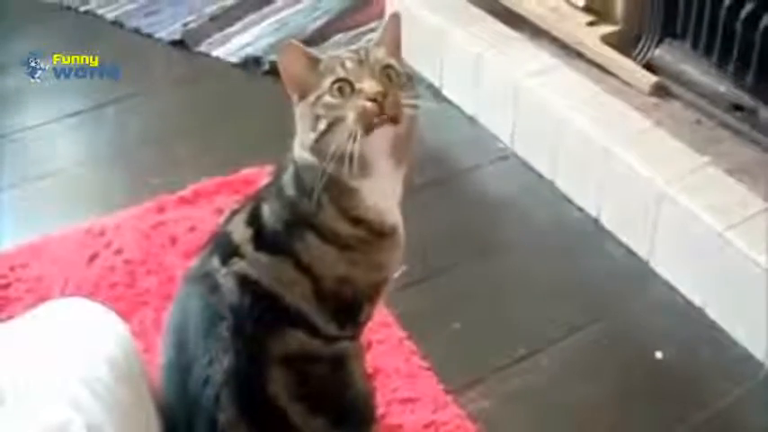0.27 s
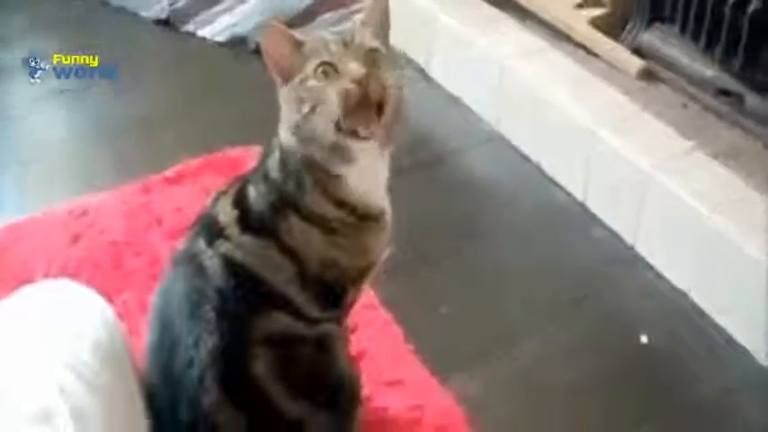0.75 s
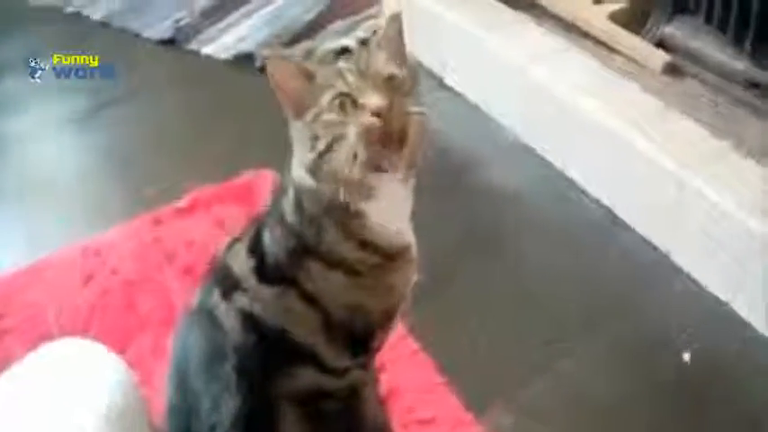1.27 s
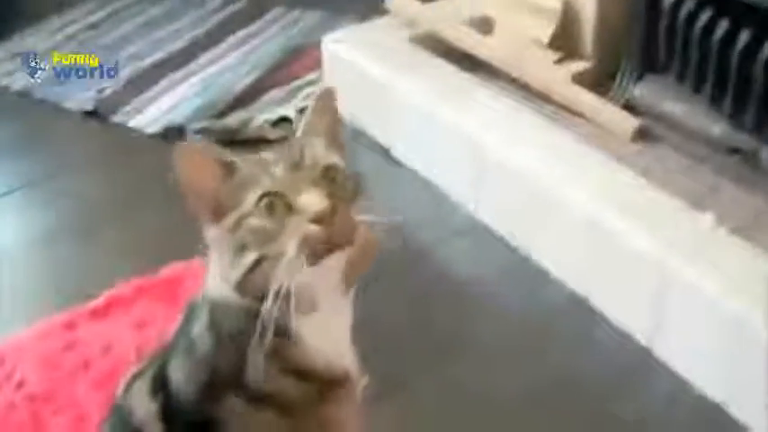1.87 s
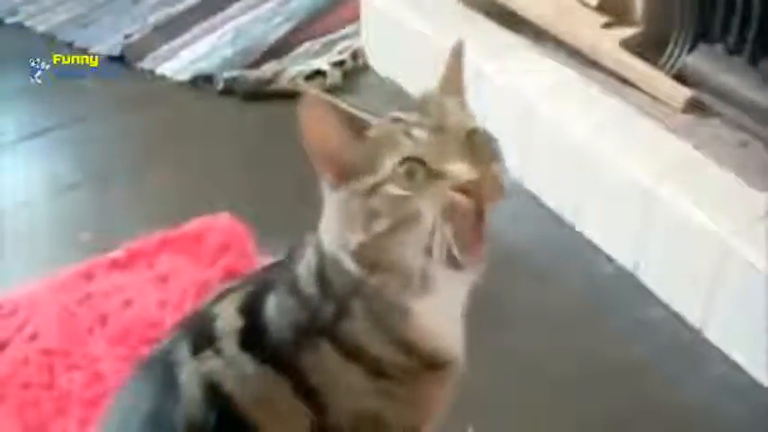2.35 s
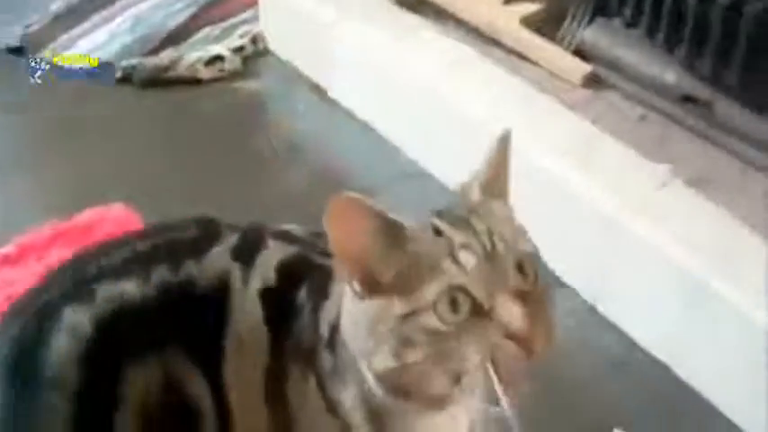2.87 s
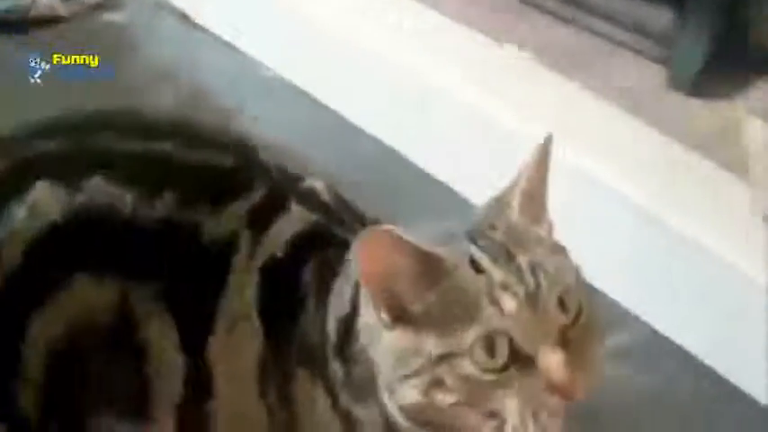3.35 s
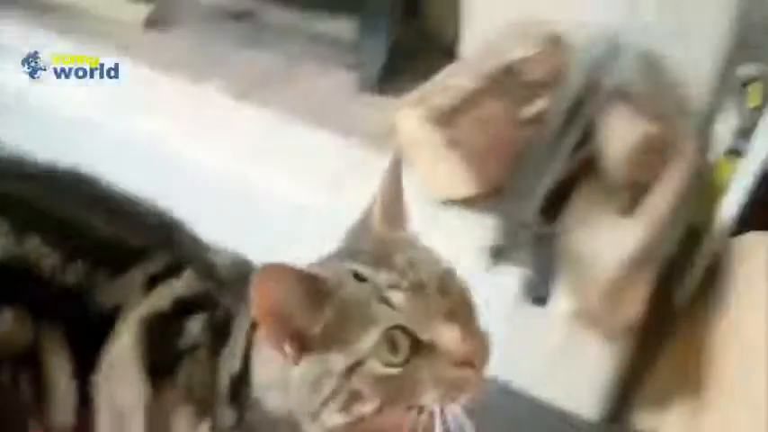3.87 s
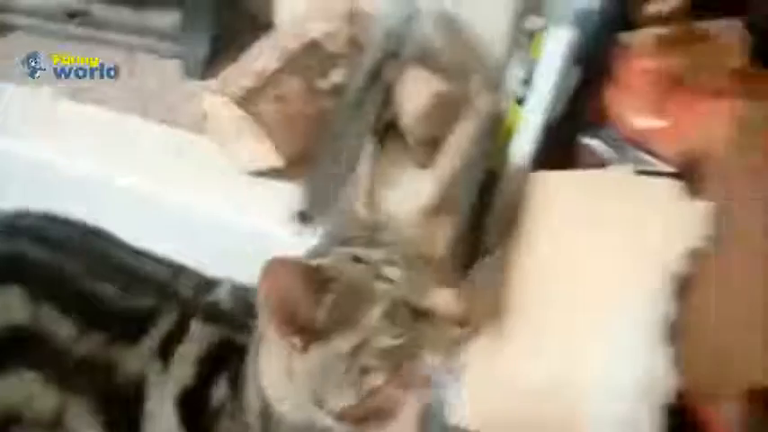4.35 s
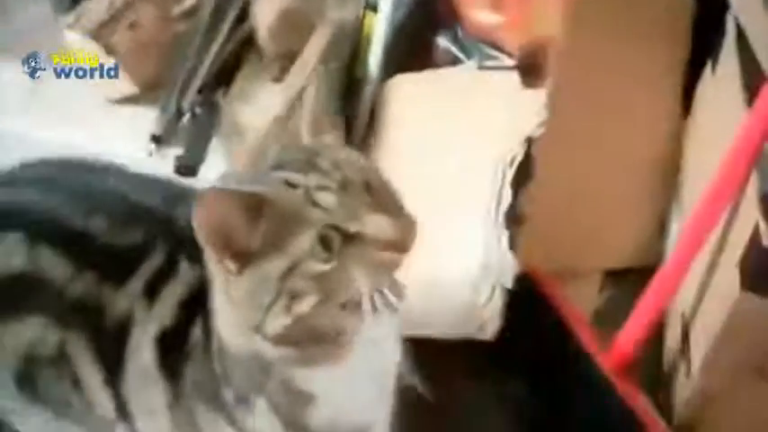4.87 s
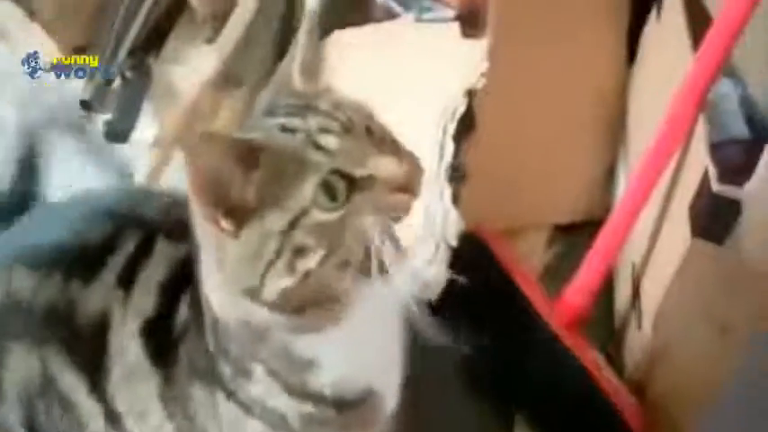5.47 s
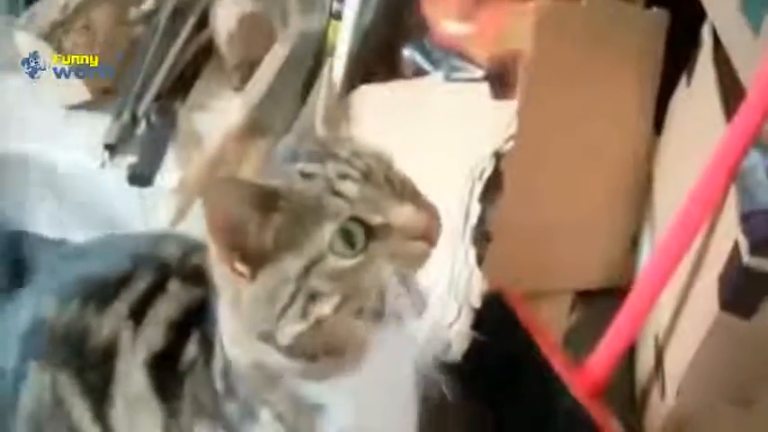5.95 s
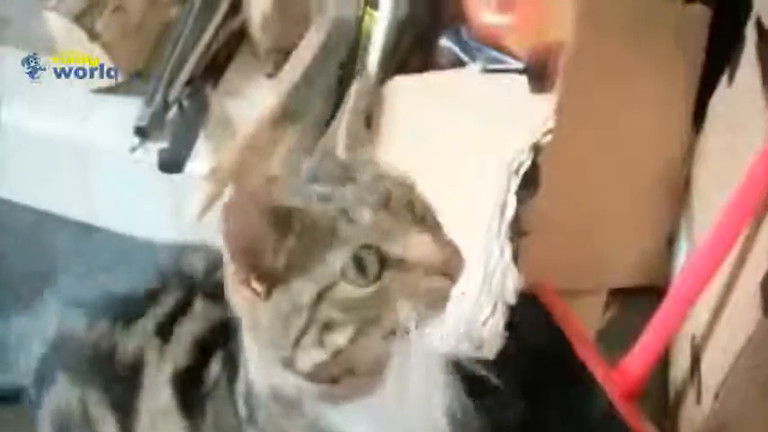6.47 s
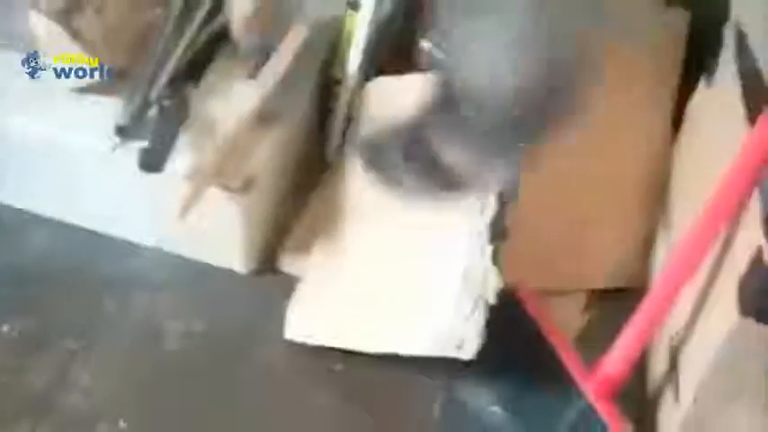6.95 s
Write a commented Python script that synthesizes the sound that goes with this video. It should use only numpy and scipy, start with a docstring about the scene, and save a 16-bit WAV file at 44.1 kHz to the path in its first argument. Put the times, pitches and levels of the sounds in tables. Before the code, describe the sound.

A cat chatters close by in short, creaky, clicking chirps over a steady hiss, with a few light taps and bumps.

```python
"""A cat chatters at prey in a small, stone-floored room, close to a hissy, narrow-band microphone.
It chirps from the start: uneven snaps of the larynx ring the mouth near 2 kHz in a swelling run of
creaks, then air rasps past the teeth. Four light taps come just after two seconds. From three seconds
on, wet ticks join in and a voiced peep leads the odd chirp. Two soft knocks fall around four seconds,
a dry click near five, and at the end something bumps close to the microphone."""
import sys
import numpy as np
from scipy import signal
from scipy.fft import rfft, irfft, next_fast_len
from scipy.io import wavfile
from scipy.ndimage import uniform_filter1d

SR = 44100
rng = np.random.default_rng(int(sys.argv[2]) if len(sys.argv) > 2 else 0)


def transcribe(u):
    """Save the signal u as a 16-bit wav file named by the first command-line argument.

    u: samples, shape (n,) or (channels, n), limited to [-1, 1]; the rate is SR.
    q: integer samples, one column per channel.
    """
    v = np.clip(np.atleast_2d(u).T, -1, 1)
    q = np.round(v * 32767).astype(np.int16)
    wavfile.write(sys.argv[1], SR, q)


N = 317947

# The cat's chirps, close up. Each row: start, opening length and main creak length in seconds, mouth
# resonance in Hz, then in relative dB the mouth, its swell from the opening, the upper resonances,
# the throat and the rasp.
CHIRPS = [(0.173, .017, 0.0075, 2070, -18, 7.5, -18, -31, -31.5),
          (0.298, .013, .023, 2000, -29, 2, -25, -24, -35),
          (0.749, .010, .026, 2010, -23.5, 5, -25.5, -29, -32.5),
          (0.868, 0.018, .012, 1940, -23, 10, -25, -30.5, -30.5),
          (0.972, 0.0054, 0.021, 2040, -24, 3, -25.5, -30.5, -33),
          (1.396, .004, 0.0036, 2040, -25, 18, -26, -45, -31.5),
          (1.525, .020, 0.0036, 1930, -20, 14, -32, -31, -38),
          (2.411, 0.017, .016, 2110, -16.5, 6, -19.5, -28.5, -31.5),
          (2.527, 0.0089, .016, 1940, -21, 6, -30.5, -24, -32.5),
          (2.622, .008, .011, 2000, -21, 11, -31, -32, -37),
          (3.066, 0.013, .021, 1975, -18.5, 8.5, -23, -24.5, -31.5),
          (3.222, .018, .016, 2180, -16.5, 0.5, -18, -24, -32),
          (3.336, .019, .005, 2050, -13.5, 11, -19.5, -30, -38),
          (3.811, .014, 0.014, 2116, -17, 4, -19.5, -29, -33),
          (3.982, .010, 0.0065, 1915, -17.5, 18, -23.5, -25, -37),
          (4.629, .006, .0051, 2010, -20, 10, -25.5, -36, -31.5),
          (4.804, .007, 0.012, 1980, -27.5, 1.5, -26.5, -32, -33.5),
          (5.235, .016, .018, 2000, -14, 8.5, -22, -23.5, -35),
          (5.387, .020, 0.0081, 2060, -17, 10, -20, -25.5, -30.5),
          (6.025, .021, 0.013, 2040, -15.5, 5.5, -20, -31.5, -29.5),
          (6.186, .020, 0.0099, 2085, -15.5, 7, -24, -27.5, -32),
          (6.538, .013, .016, 2100, -14.5, 8, -18, -22, -42),
          (6.68, 0.015, 0.022, 1850, -32.5, 12, -35, -23, -48),
          (6.809, 0.0091, .018, 2090, -16.5, 8.5, -21.5, -22, -42)]
# Upper resonances of the mouth. Each row: frequency in Hz, width in Hz, gain in dB.
UPPER_RESONANCES = [(2660, 290, -3.5), (3466, 450, 3), (4560, 420, -1.5), (4860, 440, -21)]
# Voiced peeps. Each row: start and length in seconds, first pitch, last pitch and resonance in Hz,
# level in dB.
PEEPS = [(3.327, 0.012, 541, 460, 1009, -25.5), (6.032, 0.0255, 568, 583, 1756, -23),
         (6.679, 0.023, 483, 566, 1071, -41), (6.799, 0.018, 540, 461, 930, -21)]
# Thin squeaks between the teeth. Each row: start and length in seconds, resonance in Hz, level in dB.
SQUEAKS = [(5.418, 0.0074, 3400, -21), (6.683, 0.03, 3960, -28.5), (6.71, .008, 4330, -26.5)]
# Wet ticks of tongue and teeth. Each row: start in seconds, peak level in dB, ring in Hz.
TICKS = [(3.168, -10, 1980), (3.186, -5.5, 2130), (5.181, -10.5, 2030), (5.205, -16, 2110),
         (5.764, -15.5, 2287), (5.864, -18, 2215), (6.507, -7.5, 2142), (7.118, -12, 2180)]
# Colour of the sound leaving the muzzle. Each row: frequency in Hz, gain in dB.
MUZZLE_COLOUR = [(450, -0.5), (850, .5), (1200, -.5), (1650, .5), (2000, -.5), (2400, 0.14), (3500, -0.14),
                 (4500, 0), (5600, -1.5), (7000, -2)]
# Taps and bumps near the microphone. Each row: start in seconds, clack level in dB, thud level in dB,
# loss from touch to touch in dB.
KNOCKS = [(2.087, -17.5, -45, 20), (2.131, -18, -45, 20), (2.179, -17, -45, 20), (2.279, -15.5, -40, 15),
          (3.992, -28, -21, 8), (4.197, -40, -26, 8), (7.072, -9, -19, 2), (7.164, -11, -5, 5),
          (7.191, -6.5, -10, 1.5)]
# Modes of the clack, the thud and the dry click. Each row: frequency in Hz, relative level in dB,
# seconds to fall by 60 dB.
CLACK_MODES = [(382, -7.5, .012), (703, -0.5, 0.014), (985, -5.5, .013), (2400, -6, 0.0025)]
THUD_MODES = [(62, -4.5, 0.069), (196, 0, .028), (290, -4.5, 0.024)]
CLICK_MODES = [(1150, -8, .0045), (3450, -2.5, .0013)]
# Colour of the reflections off the hard floor and walls. Each row: frequency in Hz, gain in dB.
WALL_COLOUR = [(300, -6.5), (1000, 2.5), (2050, -4.5), (2700, -3), (3600, -2), (4500, -8.5), (6000, -0.5)]
# The microphone's hiss. Each row: frequency in Hz, relative spectral density in dB.
HISS_SPECTRUM = [(20, 3), (40, -13.5), (90, -11.5), (170, -11.5), (350, -12.5), (600, -12.5), (1500, -14.5),
                 (2200, -15.5), (3600, -16.5), (4800, -19), (6300, -27.5), (7500, -25.5), (9000, -63.5)]
# The microphone's treble roll-off. Each row: frequency in Hz, gain in dB.
MICROPHONE_RESPONSE = [(4600, -1), (5050, -0.5), (5450, -6), (5950, -5.5), (6400, -12), (6750, -21.5),
                       (7100, -47)]


def creaks(mouth_width_hz=215, skirt_width_hz=1700, throat_hz=920, throat_width_hz=560, lead_s=.008):
    """The same snaps ring the mouth, its upper resonances and the throat, and crack out between the lips."""
    out = np.zeros(N)
    lips = signal.butter(2, [1150, 3800], "band", fs=SR, output="sos")
    for start, length, hz, mouth_db, upper_db, throat_db in jaw_strokes():
        snaps, air = larynx(length, lead_s)
        ring = resonate(snaps + from_db(-13.5) * air, hz, mouth_width_hz)
        ring = resonate(ring, hz, skirt_width_hz)  # lets the ring swell and darkens its flanks
        ring = sustain(ring, length, lead_s)
        layers = [(bend(ring, lead_s + length / 2), mouth_db),
                  (signal.sosfilt(lips, snaps), mouth_db - 10),
                  (upper_mouth(snaps + air), upper_db - 4.5),
                  (resonate(snaps / 2 + air, throat_hz, throat_width_hz), throat_db - 2)]
        for sound, db in layers:
            unit_power = sound * np.sqrt(length * SR / np.sum(sound ** 2))
            add(out, start - lead_s, from_db(db) * unit_power)
    return out


def jaw_strokes(rise_hz_per_s=11000, ramp_db=4, dull_db=8, throat_fade_db=13):
    """Two soft, low, throaty creaks as the jaw opens, then the main creak, louder and brighter."""
    for start, opening, main, hz, mouth_db, swell_db, upper_db, throat_db, _ in CHIRPS:
        for half in (0, 1):
            step_db = (half - .5) * ramp_db
            low_hz = hz - rise_hz_per_s * opening * (1 - half / 2)
            yield (start + half * opening / 2, opening / 2, low_hz,
                   mouth_db - swell_db + step_db, upper_db - dull_db + step_db, throat_db)
        yield start + opening, main, hz, mouth_db, upper_db, throat_db - throat_fade_db


def larynx(length, lead_s, gap_s=.004, unevenness=.3, puff_gain=.82, puff_decay_s=.0017, leak_gain=.063):
    """Air starts to leak, then come uneven snaps, each with a turbulent puff; gives snaps and air."""
    t = clock(lead_s + length)
    gaps = gap_s * np.exp(unevenness * rng.standard_normal(24))
    times = np.cumsum(gaps) - gaps[0]
    sizes = from_db(rng.standard_normal(24))  # 1 dB of spread
    inside = times <= max(length - gap_s / 3, 0)
    snaps = np.zeros(len(t))
    snaps[((lead_s + times[inside]) * SR).astype(int)] = sizes[inside]
    pole = np.exp(-1 / (puff_decay_s * SR))
    puffs = signal.lfilter([np.sqrt(1 - pole * pole)], [1, -pole], snaps)
    leak = leak_gain * gate(t, lead_s + length, lead_s)
    return snaps, (puff_gain * puffs + leak) * rng.standard_normal(len(t))


def sustain(ring, length, lead_s, rise_s=.0013, release_s=.003, smoothing_s=.0033, evenness=.95):
    """The flow partly evens out a ring between snaps: it swells, throbs through the creak and dies."""
    t = np.arange(len(ring)) / SR - lead_s
    power = np.abs(uniform_filter1d(ring ** 2, int(smoothing_s * SR)))
    envelope = np.exp(np.minimum(t - rise_s, 0) / rise_s - np.maximum(t - length, 0) / release_s)
    return envelope * ring / np.sqrt(power + np.max(power) / 100) ** evenness


def bend(ring, middle_s, share_per_s=3.5):
    """The ring glides upward, passing through its own pitch at the middle of the creak."""
    t = np.arange(len(ring)) / SR
    warped_time = t + share_per_s * (t - middle_s) ** 2 / 2
    return np.interp(warped_time, t, ring, right=0)


def upper_mouth(x):
    """The mouth's upper resonances ring in parallel, with alternating signs."""
    return sum((-1) ** k * from_db(db) * resonate(x, hz, width_hz)
               for k, (hz, width_hz, db) in enumerate(UPPER_RESONANCES))


def rasps(length=.041, delay_s=.001, fade_db_per_s=171, grain_db=3, teeth_gain=.5):
    """Grainy air fades after each chirp, partly through the mouth, partly straight off the teeth."""
    out, t = np.zeros(N), clock(length)
    teeth = signal.butter(2, [2400, 4500], "band", fs=SR, output="sos")
    envelope = gate(t, length, edge_s=.0034) * from_db(fade_db_per_s * (length / 4 - t))
    for start, opening, main, *_, db in CHIRPS:
        turbulence = rng.standard_normal((2, len(t)))
        inner, outer = turbulence * from_db(grain_db * rng.standard_normal(len(t)))
        rasp = rms_one(upper_mouth(inner) + teeth_gain * signal.sosfilt(teeth, outer))
        add(out, start + opening + main + delay_s, from_db(db) * rasp * envelope)
    return out


def peeps(width_hz=380, jitter=.04, jitter_step_s=.0018):
    """The folds vibrate almost evenly for a moment; the harmonic nearest the resonance stands out."""
    out = np.zeros(N)
    for start, length, first_hz, last_hz, resonance_hz, db in PEEPS:
        t = clock(length)
        waver = np.interp(t / jitter_step_s, np.arange(64), rng.standard_normal(64))
        pitch = np.interp(t, [0, length], [first_hz, last_hz]) * (1 + jitter * waver)
        phase = 2 * np.pi * np.cumsum(pitch) / SR
        folds = sum(np.cos(k * phase) / k for k in range(1, 8))
        peep = rms_one(resonate(folds, resonance_hz, width_hz))
        add(out, start, from_db(db) * peep * gate(t, length, edge_s=.0027))
    return out


def squeaks(width_hz=600):
    """Air through a narrow gap between the teeth rings one high resonance."""
    out = np.zeros(N)
    for start, length, hz, db in SQUEAKS:
        t = clock(length)
        air = rng.standard_normal(len(t))
        squeak = rms_one(resonate(resonate(air, hz, width_hz), hz, width_hz))
        add(out, start, from_db(db) * squeak * gate(t, length, edge_s=.002))
    return out


def ticks(width_hz=420, skirt_width_hz=2300, spread_s=.00051):
    """Small clicks inside the mouth, rounded and spread a little by the wet tongue."""
    out, t = np.zeros(N), clock(spread_s)
    for start, db, hz in TICKS:
        wetness = from_db(-21) * rng.standard_normal(len(t)) * np.exp(-t / spread_s)
        click = signal.unit_impulse(len(t)) + wetness
        ring = resonate(resonate(click, hz, width_hz), hz, skirt_width_hz)
        tick = ring + from_db(-14) * upper_mouth(click) + from_db(-34) * click
        add(out, start, from_db(db) * tick / np.max(np.abs(tick)))
    return out


def knocks(touch_gap_s=.0032, click_s=4.9425):
    """Near the microphone, knocks rattle in three quick touches and heavy ones thud; one just clicks."""
    out = np.zeros(N)
    for start, clack_db, thud_db, loss_db in KNOCKS:
        for touch, stray in enumerate(rng.uniform(-.17, .15, size=3)):
            clack = from_db(clack_db - touch * loss_db) * struck(CLACK_MODES)
            add(out, start + touch * (1 + stray) * touch_gap_s, clack)
        add(out, start, from_db(thud_db) * struck(THUD_MODES))
    add(out, click_s, struck(CLICK_MODES))
    return out


def struck(modes):
    """Heavily damped modes ring out after one contact, with alternating signs."""
    t = clock(.05)
    return sum((-1) ** k * from_db(db - 60 * t / t60) * np.sin(2 * np.pi * hz * t)
               for k, (hz, db, t60) in enumerate(modes))


def room(x, t60=.2, reflections_db=-6.5, first_echo_s=.009, linger_db=-11.5):
    """Dense short reflections, drawn afresh each second so no one colouring persists, and a faint ring."""
    reflections, t = np.zeros(N), clock(t60)
    for at in range(0, N, SR):
        tail = rng.standard_normal(len(t)) * from_db(-60 * t / t60) * (t > first_echo_s)
        tail = colour(tail / np.sqrt(np.sum(tail ** 2)), WALL_COLOUR)
        add(reflections, at / SR, signal.fftconvolve(x[at:at + SR], tail))
    ring = resonate(x + 1e-18, hz=2050, width_hz=15)
    return from_db(reflections_db) * reflections + from_db(linger_db) * ring


def fizz(peak_s=3.832, spread_s=.0068, db=-40.5):
    """A brief high-treble fizz, like a recorder overloading, sounds during one loud chirp."""
    treble = signal.butter(2, [6500, 11000], "band", fs=SR, output="sos")
    noise = rms_one(signal.sosfilt(treble, rng.standard_normal(N)))
    return from_db(db) * noise * np.exp(-np.abs(np.arange(N) / SR - peak_s) / spread_s)


def hiss(db=-31.5):
    """The microphone's steady hiss lies behind everything, nearly white up into the treble."""
    noise = rng.standard_normal(next_fast_len(N))
    return from_db(db) * rms_one(colour(noise, HISS_SPECTRUM)[:N])


def from_db(db):
    """Decibels to gain."""
    return 10 ** (np.asarray(db) / 20)


def rms_one(x):
    """Scale to an rms of 1."""
    return x / np.sqrt(np.mean(x ** 2) + 1e-20)


def add(out, start, sound):
    """Mix a sound in at a start time in seconds."""
    at = max(round(start * SR), 0)
    out[at:at + len(sound)] += sound[:max(N - at, 0)]


def colour(x, points):
    """Filter by a spectrum of (Hz, dB) points."""
    hz, db = np.transpose(points)
    bins = np.maximum(np.fft.rfftfreq(len(x), 1 / SR), 1)
    gain = from_db(np.interp(np.log(bins), np.log(hz), db))
    return irfft(rfft(x) * gain, len(x))


def resonate(x, hz, width_hz):
    """Two-pole resonance with gain 1 at its peak."""
    r = np.exp(-np.pi * width_hz / SR)
    feedback = [1, -2 * r * np.cos(2 * np.pi * hz / SR), r * r]
    return signal.lfilter(np.array([1, 0, -1]) * (1 - r * r) / 2, feedback, x)


def clock(length):
    """Time axis of a short sound in seconds, with room to ring out."""
    return np.arange(int(length * SR) + SR // 40) / SR


def gate(t, length, edge_s):
    """Opens at 0 and shuts after a length, with sloping edges."""
    return np.clip(t / edge_s, 0, 1) * np.clip((length - t) / edge_s + .5, 0, 1)


def scene():
    """The cat close up with the small room around it, the nearby knocks and the hiss, in mono."""
    mouth = creaks() + peeps() + rasps() + squeaks() + ticks()
    cat = colour(np.pad(mouth, (0, next_fast_len(N) - N)), MUZZLE_COLOUR)[:N]
    return (cat + room(cat) + knocks() + hiss())[None]


def record(dry, microphone_top_hz=7200, cutoff_hz=11000):
    """The microphone loses the treble above 5 kHz; one fizz is added after it and the very top is cut."""
    microphone_top = signal.ellip(10, .1, 80, microphone_top_hz, fs=SR, output="sos")
    top_cut = signal.ellip(10, .1, 80, cutoff_hz, fs=SR, output="sos")
    padded = np.pad(dry[0], (0, next_fast_len(N + SR // 10) - N))
    dull = signal.sosfilt(microphone_top, colour(padded, MICROPHONE_RESPONSE)[:N])
    return signal.sosfilt(top_cut, dull + fizz())[None]


dry = scene()
out = record(dry)
transcribe(out)
```